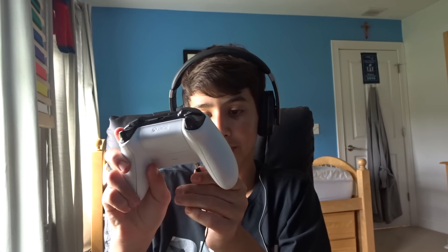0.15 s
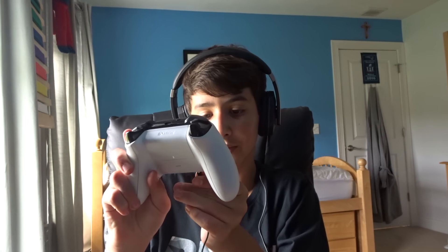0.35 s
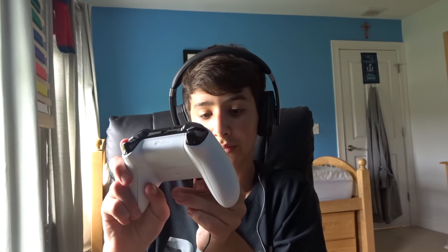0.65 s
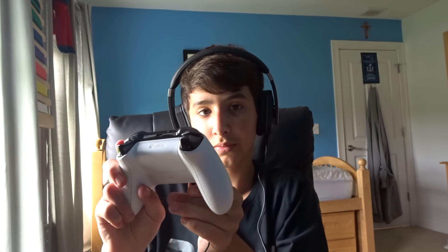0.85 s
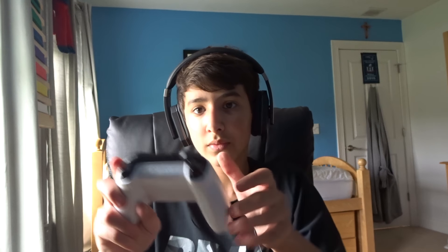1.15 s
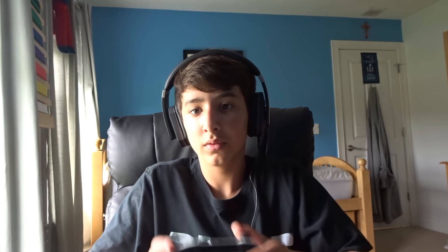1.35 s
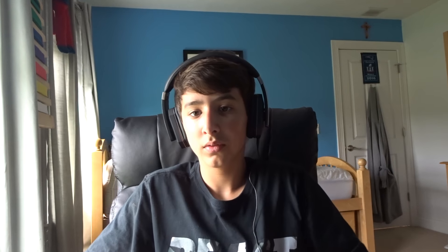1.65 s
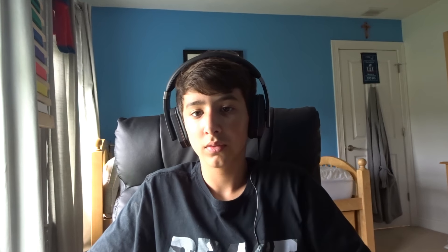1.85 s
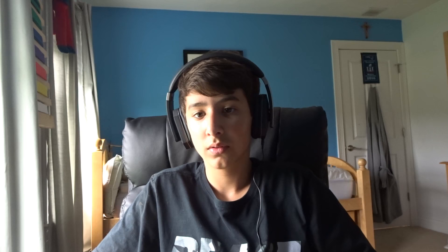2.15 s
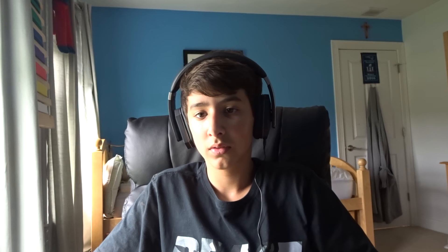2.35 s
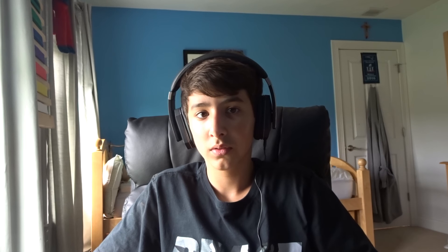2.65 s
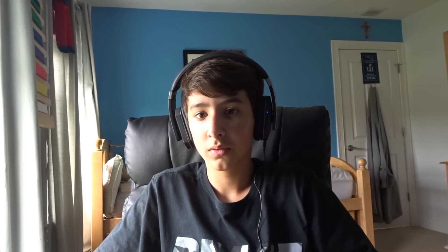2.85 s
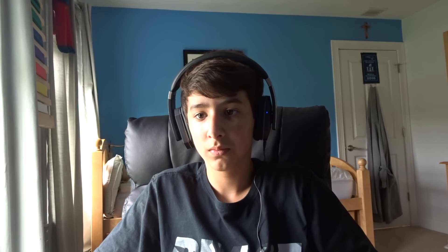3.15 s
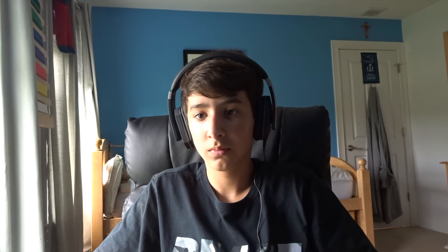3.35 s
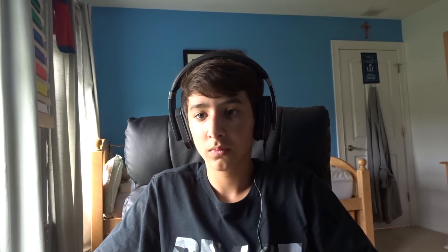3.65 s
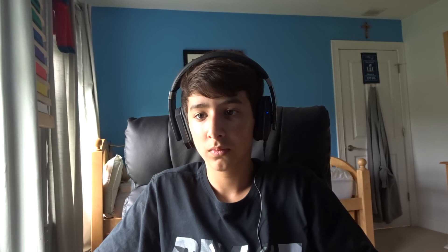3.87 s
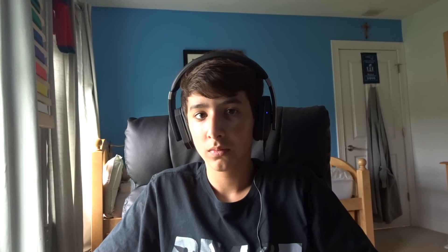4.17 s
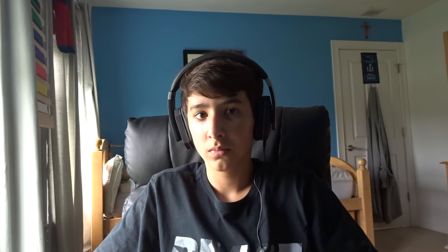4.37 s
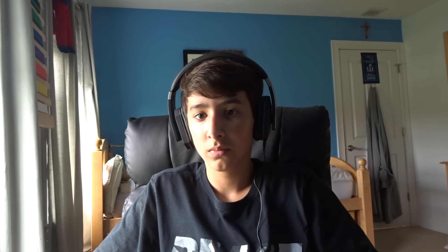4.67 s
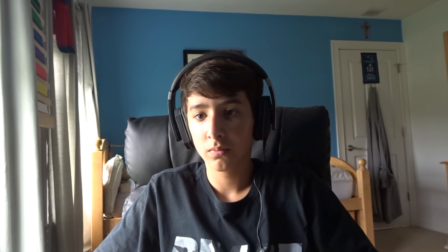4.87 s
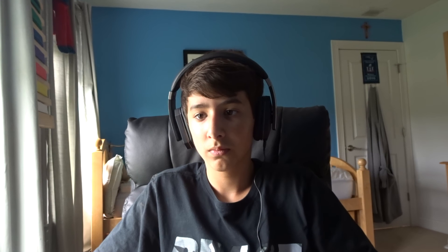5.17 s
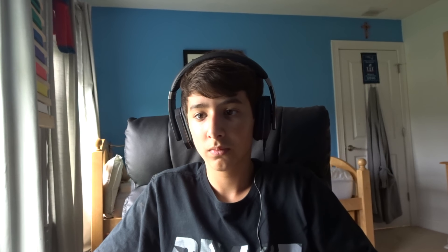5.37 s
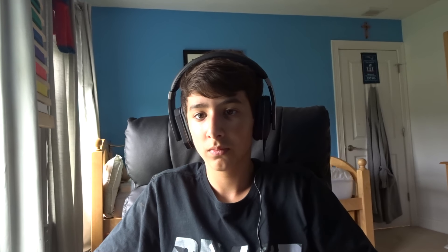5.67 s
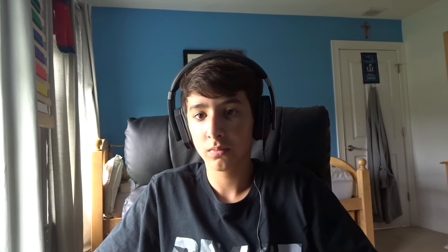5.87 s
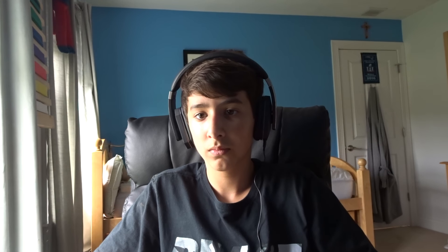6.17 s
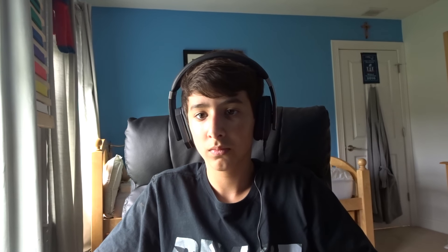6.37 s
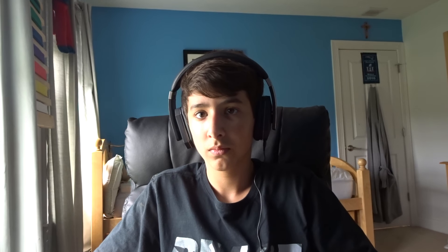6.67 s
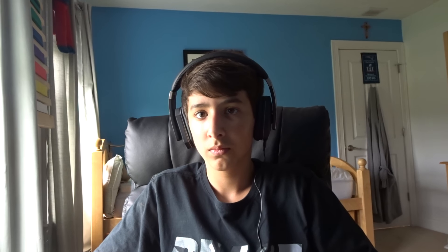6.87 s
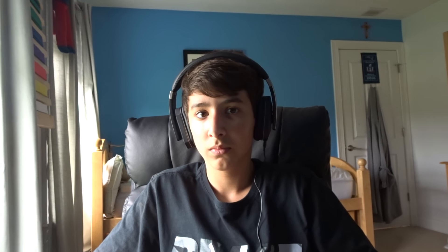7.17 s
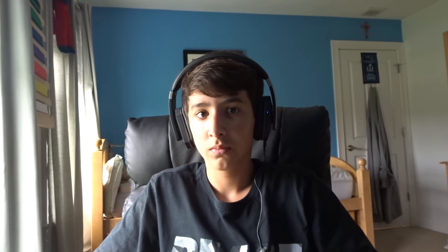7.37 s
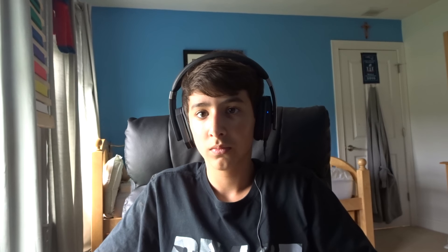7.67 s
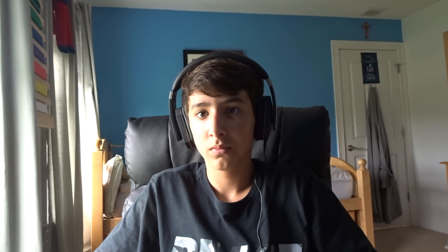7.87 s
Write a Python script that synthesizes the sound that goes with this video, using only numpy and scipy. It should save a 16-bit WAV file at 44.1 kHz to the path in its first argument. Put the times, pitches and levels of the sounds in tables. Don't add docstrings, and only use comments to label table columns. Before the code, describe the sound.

A quiet, small carpeted bedroom heard through a thin stereo laptop microphone, with steady soft hiss and faint fan air throughout. At 0.23 to 0.3 s a plug scrapes on a plastic socket in a quick cluster of ticks; at 0.58 s it snaps home, the loudest click, with small rattles after. From 0.85 to 1.45 s fingers slip and thumbs knock faintly on the hollow shell. Around 1.58 s the shell cracks hard on the desk edge, rebounds and settles, with a swelling cloth rustle that fades by about 2 s. From 1.97 s crisp button presses begin, first about three a second, then nearly four, varying slightly in strength, a few followed by much quieter spring-back ticks. Each has brief desk and wall reflections. The last press is at 7.13 s, its release at 7.23 s; then only hiss and fan remain, slightly softer after 7.7 s.

```python
import sys
import numpy as np
from scipy import signal
from scipy.fft import rfft, irfft, next_fast_len
from scipy.io import wavfile
from scipy.ndimage import uniform_filter1d

SR = 44100
rng = np.random.default_rng(int(sys.argv[2]) if len(sys.argv) > 2 else 0)


def log_audio(samples):
    frames = np.atleast_2d(samples).T
    limited = np.clip(frames, -1, 1)
    pcm = np.round(limited * 32767).astype(np.int16)
    wavfile.write(sys.argv[1], SR, pcm)


def rack_gain(trim_db):
    fader = np.asarray(trim_db, float)
    return 10 ** (fader / 20)


N = 353726

# frequency in Hz, level in dB per Hz.
HISS_COLOUR = [(25, -31.5), (70, -33.5), (264, -27.5), (660, -11.5), (1710, -9), (4530, -15.5),
               (5560, -17.5), (11400, -24)]
# frequency in Hz, left-right likeness from -1 to 1.
HISS_ALIKE = [(60, 0.75), (170, 0.69), (490, 0.62), (1400, -0.019), (3990, -0.087), (11400, 0.032)]
# frequency in Hz, width in Hz, level in dB rms.
FAN_HOUSING = [(648.7, 51, -82.5), (4480, 1300, -75.5)]
# frequency in Hz, t60 in seconds.
ROOM_DECAY = [(700, 0.48), (1300, .25), (3500, 0.31), (9000, 0.27)]
# frequency in Hz, level in dB.
ROOM_COLOUR = [(700, 2.5), (1500, -4), (3000, -7.5), (5000, 0), (9000, -3.5)]
# frequency in Hz, left-right likeness from -1 to 1.
ROOM_ALIKE = [(60, 0.83), (170, 0.71), (490, 0.18), (1400, 1), (3990, 0.28), (11400, -0.31)]

# start in seconds, peak in dB, hollow knock in dB,
# upper shell in dB, snap in dB.
PLUG = [(0.2325, -24, -7, -0.5, -14.5), (0.2442, -24.5, 1.5, -11, -21), (0.2572, -27.5, -1, 1, -18),
        (0.2605, -27.5, -14, -10, -23), (0.2705, -16, -6, -5, -18), (0.2772, -24.5, -13, 17, 0.5),
        (0.2922, -19.5, -16, -3, -32), (0.5834, -9.5, -12, -6.5, -6), (0.603, -16, -15, -3, -11),
        (0.6162, -22.5, -23, -8, -6), (0.632, -23.5, -20, -4.5, -10.5)]
GRIP = [(0.8483, -46, -24, 1, -3), (0.9303, -39.5, -1.5, -12, -27), (0.9884, -49, -11, 3, -23),
        (1.0206, -35.5, 4.5, -6.5, -15), (1.045, -30.5, -23, -8, -20), (1.2196, -33.5, -6, 5, -1.5),
        (1.2257, -41.5, -11, 17, 9), (1.2342, -48, -8, 17.5, -2), (1.2803, -38, -31, -2, -14),
        (1.311, -42, -17, -8, -14), (1.409, -52, -7, 11, -6)]
# frequency in Hz, width in Hz, level in dB.
SOCKET_SHELL = [(835, 370, -4), (1100, 770, -2), (1886, 210, -3), (2500, 590, -6), (2950, 210, -0.5),
                (3730, 430, -5.5), (4460, 760, -2.5), (5830, 2140, 8), (8580, 2950, 7.5)]
REGIONS_HZ = [1400, 2700, 5000]
# delay in seconds, left in dB, right in dB, dullness from 0 to 1.
RAISED_PATHS = [(0, -1.5, -0.5, 0), (.0012, -1.5, 0, .2), (.0026, -3.5, -5.5, .2), (.0065, -11, -15, .2),
                (0.012, -15, -2, .3)]

# time in seconds, level in dB.
HANDS_LEVEL = [(0.66, -62), (1.2, -72.5), (1.222, -44), (1.262, -59), (1.3, -50.5), (1.35, -60),
               (1.435, -56.5), (1.6, -55.5), (1.95, -79)]
# frequency in Hz, level in dB per Hz.
SKIN_COLOUR = [(300, -62), (687, -19), (823, -9.5), (1180, -17), (1780, -8), (2880, -6.5), (5500, -11),
               (11000, -18.5)]
# start in seconds, peak in dB, pitch in Hz, t60 in seconds.
THUMB = [
    (0.992, -51, 845, 0.048),
    (1.025, -32.5, 803, 0.013),
    (1.223, -51, 832, 0.049),
    (1.416, -47.5, 818, 0.054),
    (1.429, -49, 895, 0.049),
    (1.454, -68, 876, 0.041),
    (1.66, -43.5, 908, 0.039),
    (2.073, -52, 1100, 0.067),
    (2.443, -60, 1100, 0.17),
    (6.525, -42, 840, 0.023),
]

BUMP = [
    (1.5779, -12, -6, 3, -12),
    (1.5998, -21.5, -22, -8, -18),
    (1.6499, -33, -16, -11, -24),
]
DESK_EDGE_PATHS = [(0, 4.5, 5, 0), (.0008, -13, -6.5, .2), (.0026, -12, -14, .2), (.0065, -18, 1, .2),
                   (0.011, -22, -21, .3)]

# start in seconds, peak in dB, sharpness in dB, rim in dB.
PRESSES = [(1.9731, -19.5, -1, -8.5), (2.3405, -21, -7, -3.5), (2.6531, -19.5, -2.5, -9),
           (2.9181, -19.5, -2, -9.5), (3.1857, -18, -4, -8.5), (3.4212, -21.5, -9.5, -10),
           (3.7024, -20, -4, -8.5), (3.908, -28, -9, -3), (4.1658, -25.5, -11.5, -9.5),
           (4.425, -24.5, -7, -8), (4.7038, -19.5, -2, -7.5), (4.9706, -20.5, -2, -8.5),
           (5.2262, -22.5, -3, -6.5), (5.465, -25, -4.5, -4), (5.707, -22.5, -8.5, -9.5),
           (5.951, -22, -9, -8), (6.1918, -20.5, -6.5, -4.5), (6.3913, -23, -2.5, -10.5),
           (6.6957, -23, -2.5, -10.5), (7.1314, -22, -3.5, -4.5)]
# start in seconds, peak in dB, sharpness in dB, hollow knock in dB.
RELEASES = [(2.0538, -33.5, -2.5, -4.5), (2.4313, -34.5, -6, -6.5), (2.7936, -47.5, -6, -21),
            (3.5974, -38.5, -17, -13.5), (6.111, -55, -4, -25), (6.5098, -45, -8, -4.5),
            (6.5216, -46, -2.5, -3), (6.8223, -44, -2.5, -6), (7.0268, -52.5, -12, -6), (7.0517, -64, 2, 8),
            (7.2287, -41.5, -5, -4.5)]
# frequency in Hz, width in Hz, level in dB.
BUTTON_SHELL = [(978, 285, -4.5), (1100, 160, -6), (1930, 259, -1), (2005, 357, -1.5), (2448, 282, -4),
                (3070, 487, -2.5), (3407, 354, -5.5), (4110, 570, -7), (6100, 1220, 0.5), (8650, 3600, 3.5),
                (1553, 253, -22.5), (1947, 55, -23), (1106, 40.5, -14)]
BUTTON_REGIONS_HZ = [1400, 2250, 2750, 5000]
BUTTON_PATHS = [(0, 4, 4, 0.25), (.0013, 1.5, 5.5, 0.29), (.0024, 1, 2, 0.42), (.0047, -1, -5.5, 0.38),
                (.0078, 0.5, 1.5, 0.12), (.0094, -7.5, -22, 0), (0.0137, -35, -47, .3),
                (0.019, -22, -11.5, .1), (.026, -21, -3.5, 0.77)]


def unit(x):
    return x / np.sqrt(np.mean(x ** 2) + 1e-20)


def along(points, hz):
    f, value = np.transpose(points)
    return np.interp(np.log(hz + 1), np.log(f + 1), value)


def filtered(x, response):
    size = next_fast_len(x.shape[-1] + 4096)
    spectrum = rfft(x, size) * response(np.fft.rfftfreq(size, 1 / SR))
    return irfft(spectrum, size)[..., :x.shape[-1]]


def paired(two, alike, gain):
    def mid_side_gain(hz):
        turn = np.arccos(np.clip(along(alike, hz), -1, 1)) / 2
        return gain(hz) * np.array([np.cos(turn), np.sin(turn)])

    mid, side = filtered(two, mid_side_gain)
    return np.array([mid + side, mid - side])


def resonance(f, hz, width):
    return 1j * f * width / (hz * hz - f * f + 1j * f * width)


def rustle_level():
    since = np.arange(N) / SR - 1.675
    rise_s, fall_s = 0.39, 0.2
    return rack_gain(-60.5) * np.exp(np.minimum(since / rise_s, -since / fall_s))


def quiet_room():
    hiss = unit(paired(rng.standard_normal((2, N)), HISS_ALIKE, lambda hz: rack_gain(along(HISS_COLOUR, hz))))
    air = rng.standard_normal((2, N))
    fan = np.zeros((2, N))
    for hz, width, db in FAN_HOUSING:
        fan += rack_gain(db) * unit(paired(air, HISS_ALIKE, lambda f: resonance(f, hz, width) ** 2))
    still = np.clip((np.arange(N) / SR - 7.68) / 0.12, 0, 1)
    hiss_level = rack_gain(-67 - 1.5 * still)
    return np.hypot(hiss_level, rustle_level()) * hiss + fan


def room_tail(build_s):
    size = SR // 3
    hz, t, z = signal.stft(rng.standard_normal((2, size)), SR, nperseg=128)
    decay = rack_gain(-60 * t / along(ROOM_DECAY, hz)[:, None])
    tail = signal.istft(z * decay, SR, nperseg=128)[1][:, :size]
    tail = paired(tail, ROOM_ALIKE, lambda f: rack_gain(along(ROOM_COLOUR, f)))
    tail = tail * (1 - np.exp(-(np.arange(size) / SR / build_s) ** 2))
    return tail / np.linalg.norm(tail[0])


def shell_modes(shell, t):
    hz, width, _ = np.transpose(shell)
    fade = np.pi * width[:, None] * t
    modes = 2 * np.exp(-fade) * (1 - np.exp(-2.5 * fade)) * np.sin(2 * np.pi * hz[:, None] * t)
    return modes * (-1) ** np.arange(len(hz))[:, None]


def early_paths(near):
    paths = np.zeros((2, SR // 20))
    for delay, left_db, right_db, dull in near:
        smear = np.hanning(3 + round(12 * np.clip(dull, 0, 1)))
        for side, side_db in enumerate([left_db, right_db]):
            at = round(delay * SR + rng.uniform(0, 3))
            paths[side, at:at + len(smear)] += rack_gain(side_db + rng.standard_normal()) * smear / smear.sum()
    return paths


def clicks(events, rooms_db, shell, regions_hz, near, spread_db, chatter_db, chatter_s, build_s):
    out, t = np.zeros((2, N + SR)), np.arange(SR // 30) / SR
    hz, _, level = np.transpose(shell)
    modes = shell_modes(shell, t)
    for (s, db, knock_db, *upper_db, snap_db), room_db in zip(events, rooms_db):
        strength = np.array([knock_db, 0, *upper_db, snap_db])[np.searchsorted(regions_hz, hz)]
        ring = rack_gain(db + level + strength + spread_db * rng.standard_normal(len(hz))) @ modes
        rattle = np.diff(rng.standard_normal((2, len(t) + 1)))
        chatter = rack_gain(db + snap_db + chatter_db - 60 * t / chatter_s) * rattle
        early = signal.fftconvolve(ring + chatter, early_paths(near), axes=1)
        heard = signal.fftconvolve(ring[None], rack_gain(room_db) * room_tail(build_s), axes=1)
        heard[:, :early.shape[1]] += early
        out[:, round((s + .0004) * SR):][:, :heard.shape[1]] += heard
    return out[:, :N]


def desk_push(events, push_db, push_s):
    blows = np.zeros(N)
    at = np.round(events[:, 0] * SR).astype(int)
    blows[at] = rack_gain(events[:, 1] + push_db + 5.7 * rng.standard_normal(len(events)))
    x = np.arange(SR // 10) / SR / push_s
    return signal.fftconvolve(blows, x * (2 - x) * np.exp(-x))[:N]


def plug_and_grip():
    events = np.array(PLUG + GRIP)
    rooms_db = [3.5] * len(PLUG) + [-0.7] * len(GRIP)
    heard = clicks(events, rooms_db, SOCKET_SHELL, REGIONS_HZ, RAISED_PATHS,
                   spread_db=2.5, chatter_db=-6.5, chatter_s=0.0071, build_s=0.0015)
    return heard, desk_push(events, push_db=-61, push_s=0.003)


def hands():
    z = signal.stft(rng.standard_normal((2, N)), nperseg=256)[2]
    scuffs = uniform_filter1d(rng.standard_normal(z.shape[1:]), 12, 0)
    scuffs = uniform_filter1d(scuffs, 8, 1)
    slips = signal.istft(z * rack_gain(2.55 * unit(scuffs)), nperseg=256)[1][:, :N]
    clumps = unit(uniform_filter1d(rng.standard_normal(N), 300))
    slips = paired(slips * rack_gain(2.4 * clumps), ROOM_ALIKE, lambda hz: rack_gain(along(SKIN_COLOUR, hz)))
    level_db = np.interp(np.arange(N) / SR, *np.transpose(HANDS_LEVEL), left=-120, right=-120)
    return rack_gain(level_db + 0.5) * unit(slips)


def thumb():
    out, t = np.zeros(N + SR), np.arange(SR // 5) / SR
    start = 1 - np.exp(-t / 0.0028)
    for s, db, hz, t60 in THUMB:
        knock = rack_gain(db + 4.0 - 60 * t / t60) * start * np.sin(2 * np.pi * hz * t)
        out[round(s * SR):][:len(t)] += knock
    room = signal.fftconvolve(out[None, :N], room_tail(0.0028), axes=1)[:, :N]
    return out[:N] + rack_gain(-11) * room


def desk_bump():
    events = np.array(BUMP)
    heard = clicks(events, [1] * len(events), SOCKET_SHELL, REGIONS_HZ, DESK_EDGE_PATHS,
                   spread_db=0.5, chatter_db=-8, chatter_s=0.015, build_s=0.0027)
    return heard, desk_push(events, push_db=-75, push_s=0.0028)


def button_contacts():
    press_knock_db, release_rim_db = -15, -7.5
    rows = [(s, db, press_knock_db, rim, sharp) for s, db, sharp, rim in PRESSES]
    rows += [(s, db, knock, release_rim_db, sharp) for s, db, sharp, knock in RELEASES]
    return np.array([(*row, -12 + 1.5 * row[-1]) for row in sorted(rows)])


def buttons():
    events = button_contacts()
    heard = clicks(events, [5] * len(events), BUTTON_SHELL, BUTTON_REGIONS_HZ, BUTTON_PATHS,
                   spread_db=1.37, chatter_db=-12.0, chatter_s=0.021, build_s=0.0032)
    return heard, desk_push(events, push_db=-61, push_s=0.0028)


def thin_microphone(f):
    bass_cut = (1j * f / (1j * f + 420)) ** 4
    return bass_cut * f * f / (f * f - 760 ** 2 - 1.2j * 760 * f)


def scene():
    room = quiet_room()
    socket, socket_shove = plug_and_grip()
    bump, bump_shove = desk_bump()
    button, button_shove = buttons()
    near = rack_gain(-3.5) * button + rack_gain(-9.5) * (socket + bump) + thumb()
    near = near * rack_gain([[.8], [-.8]])
    shove = socket_shove + bump_shove + button_shove
    return filtered(near, thin_microphone) + shove + hands() + room


def roll_off(x):
    return signal.sosfilt(signal.butter(12, 12010, fs=SR, output="sos"), x)


def record(dry):
    edge = [(10900, 3.5), (11300, -16.5), (13000, -12), (16000, -60)]  # (Hz, dB)
    mix = filtered(dry, lambda hz: rack_gain(along(edge, hz)))
    return roll_off(mix)


dry = scene()
out = record(dry)
log_audio(out)
```